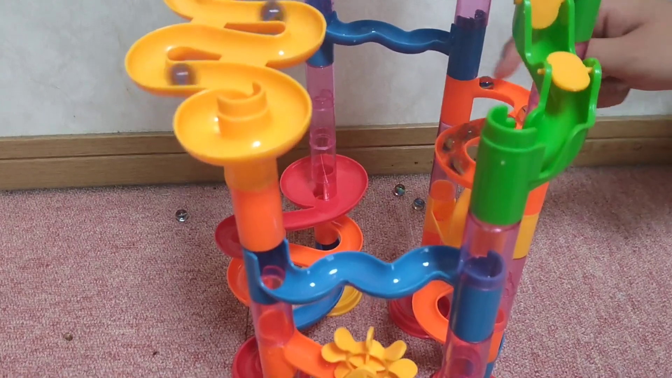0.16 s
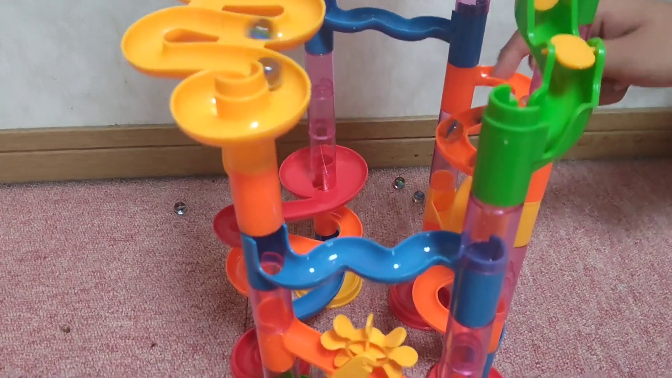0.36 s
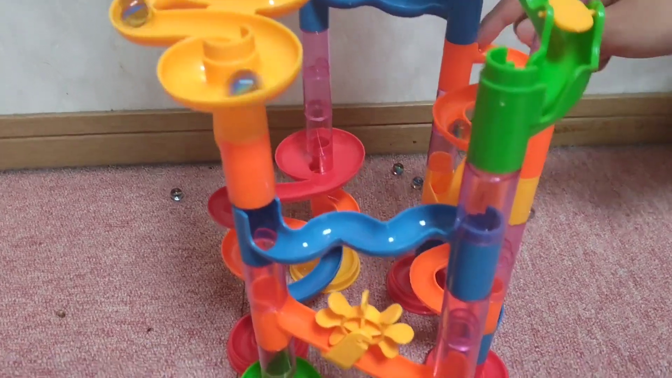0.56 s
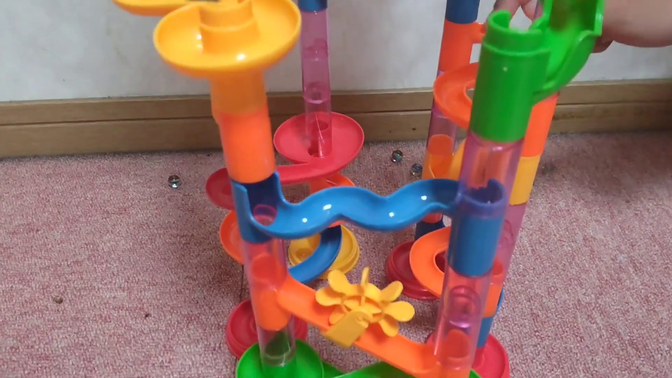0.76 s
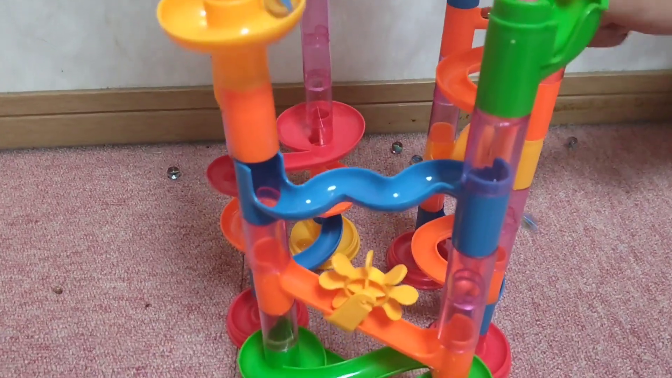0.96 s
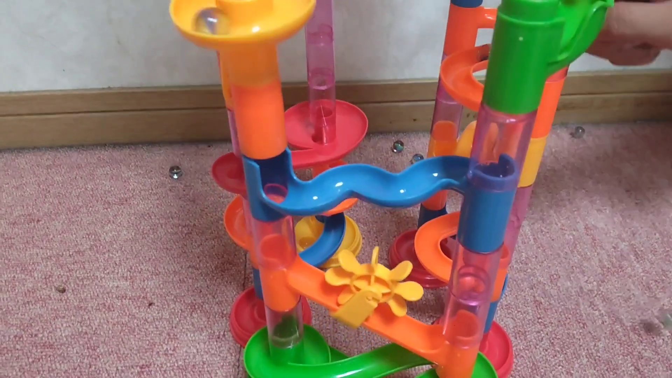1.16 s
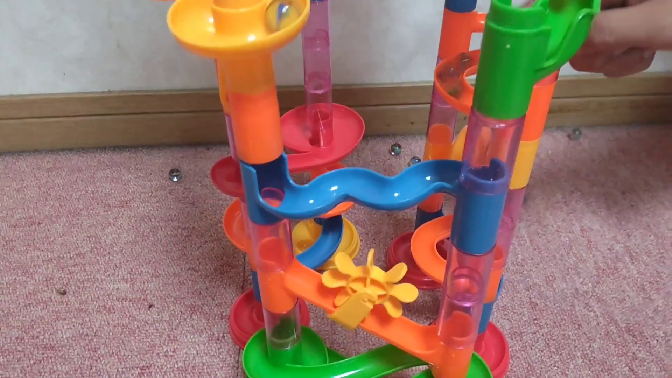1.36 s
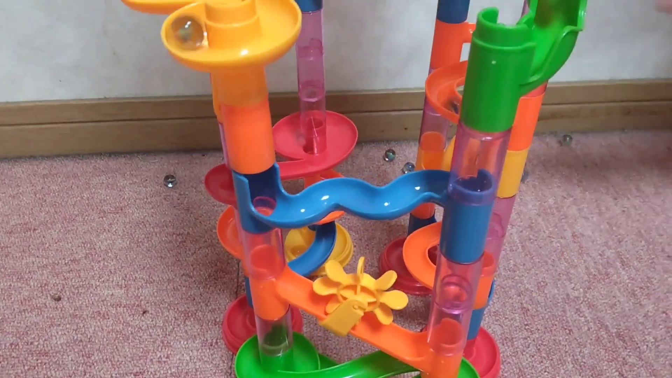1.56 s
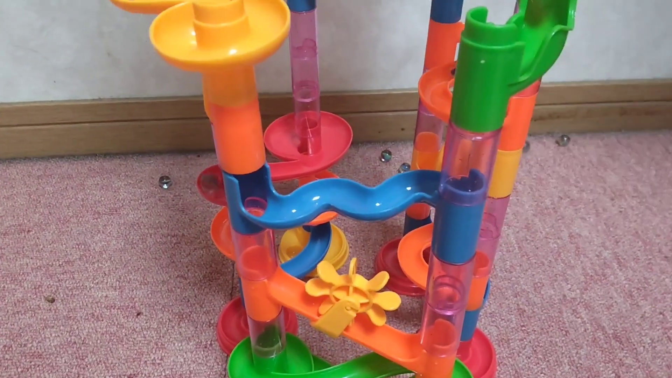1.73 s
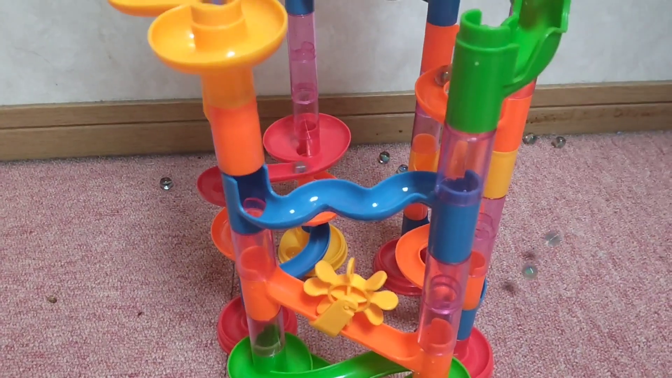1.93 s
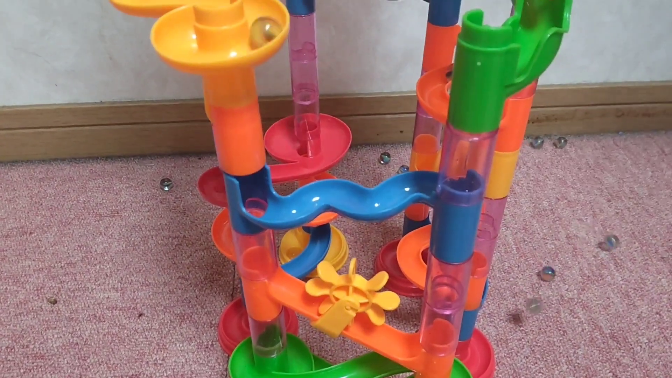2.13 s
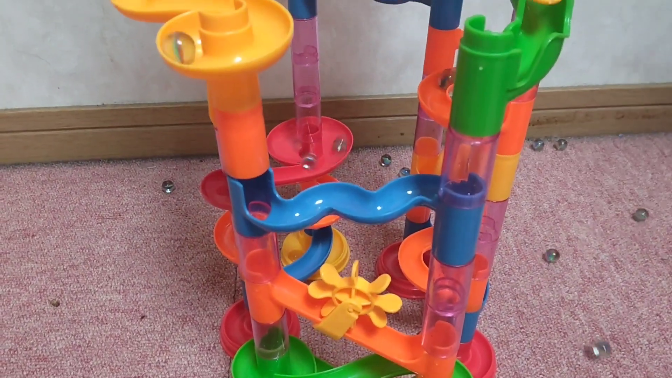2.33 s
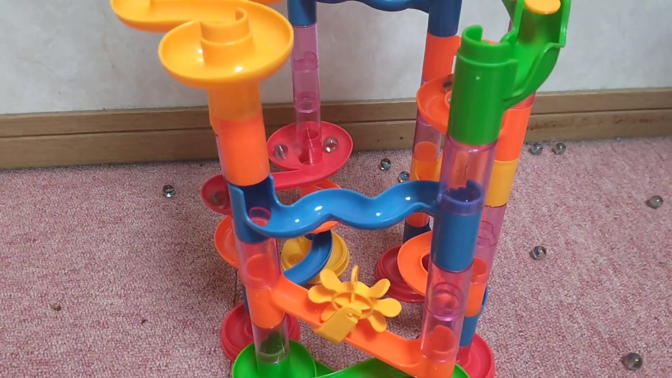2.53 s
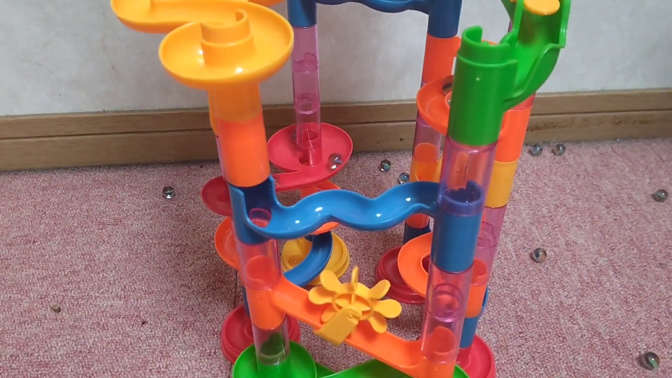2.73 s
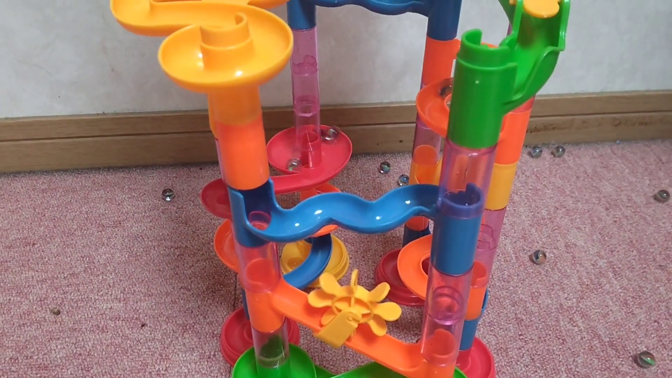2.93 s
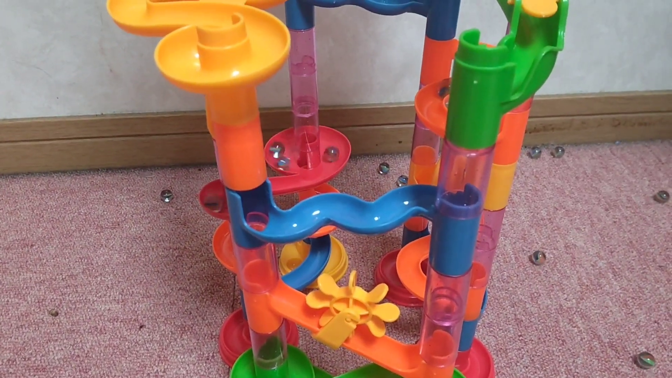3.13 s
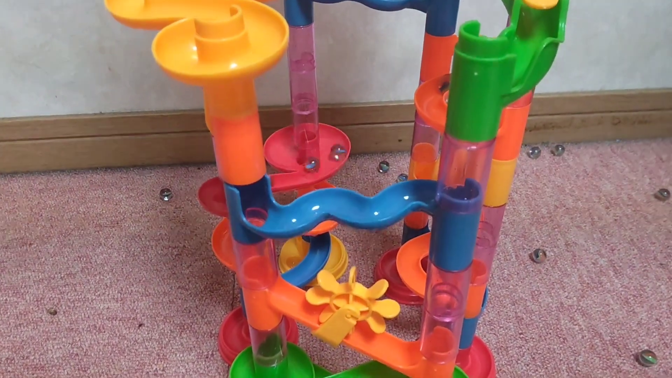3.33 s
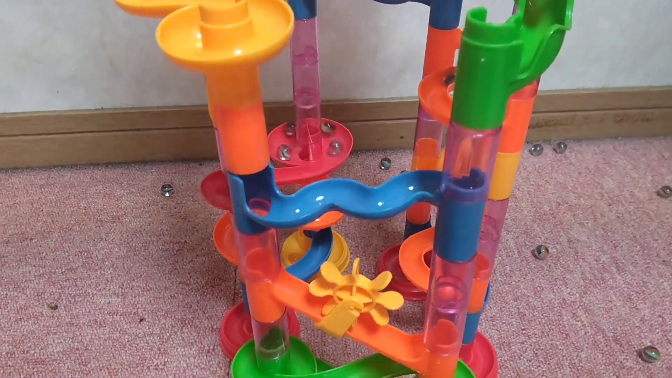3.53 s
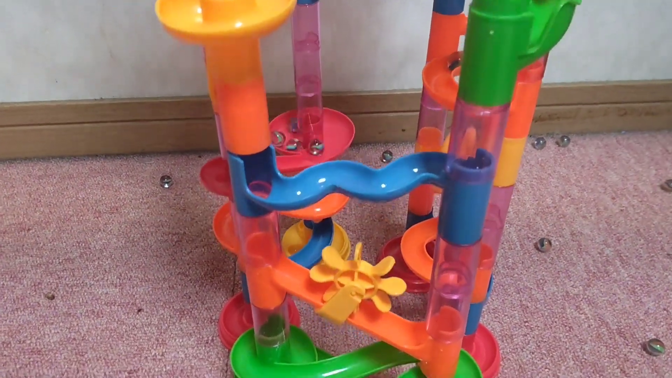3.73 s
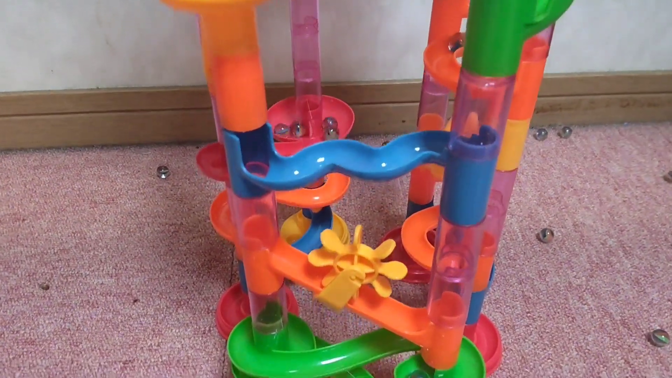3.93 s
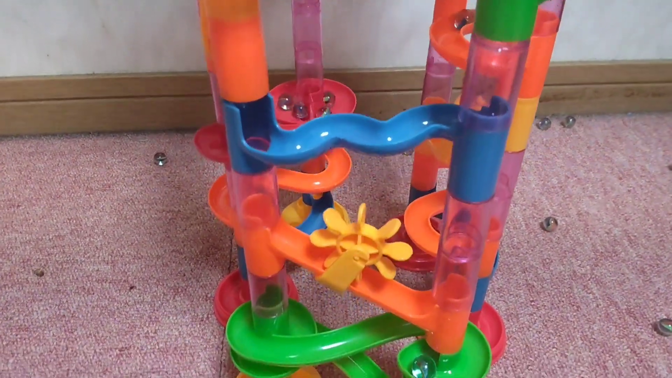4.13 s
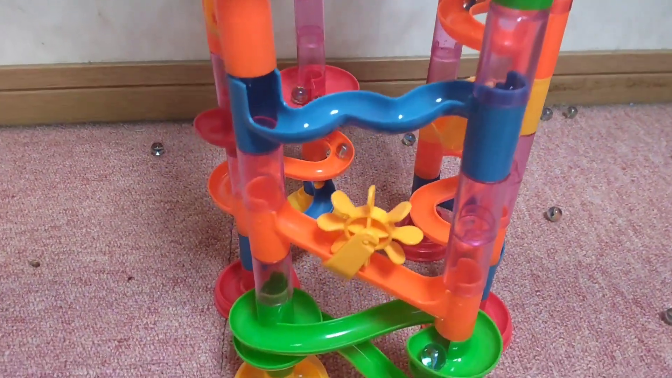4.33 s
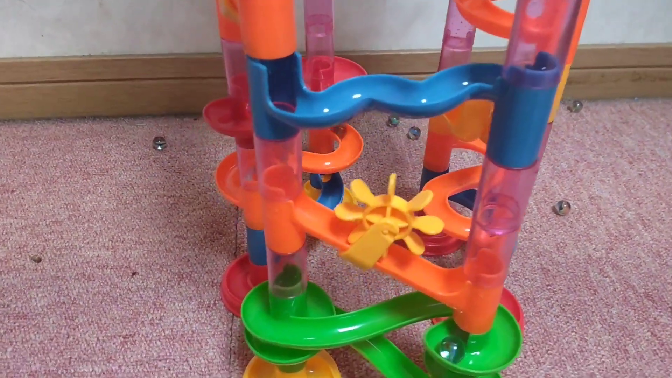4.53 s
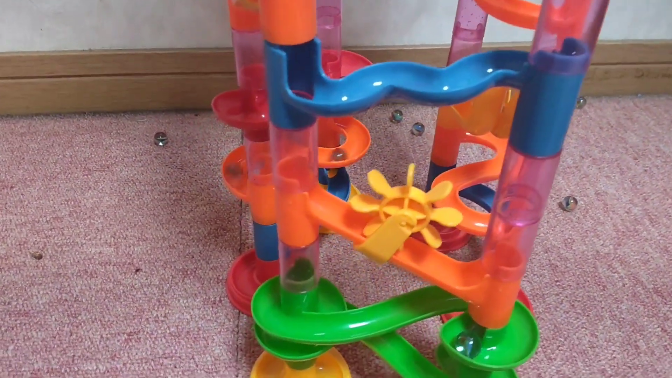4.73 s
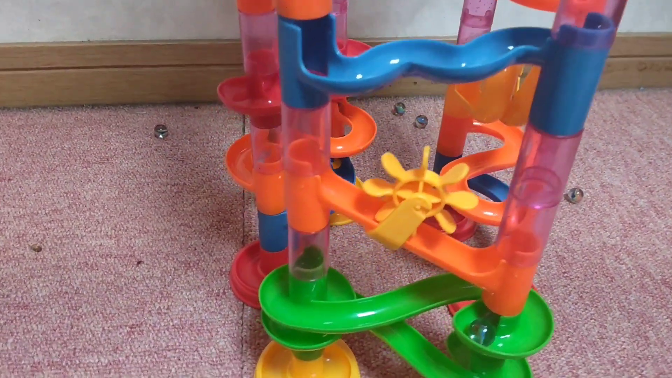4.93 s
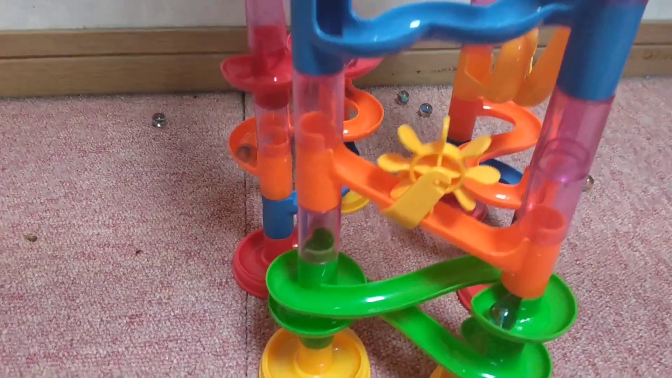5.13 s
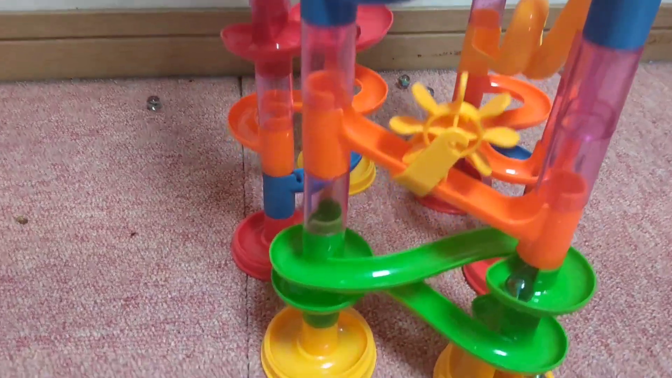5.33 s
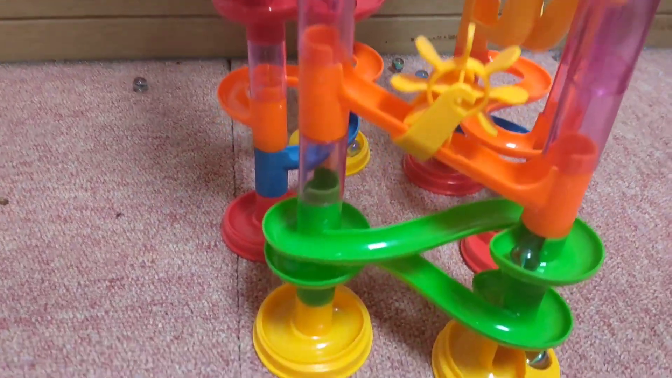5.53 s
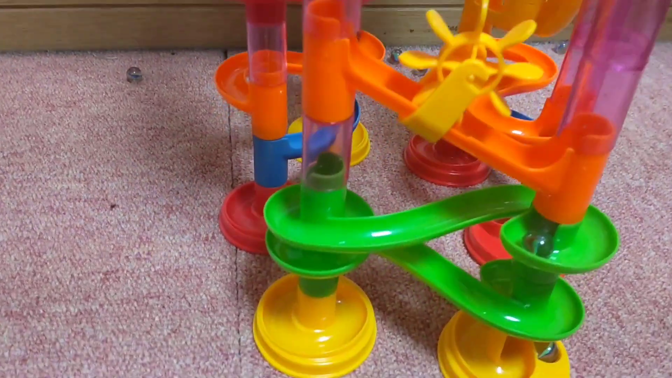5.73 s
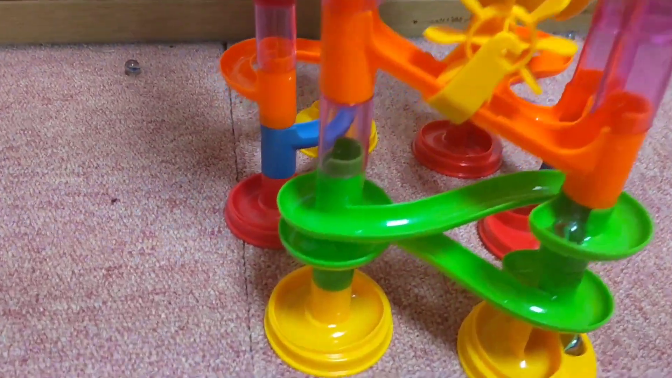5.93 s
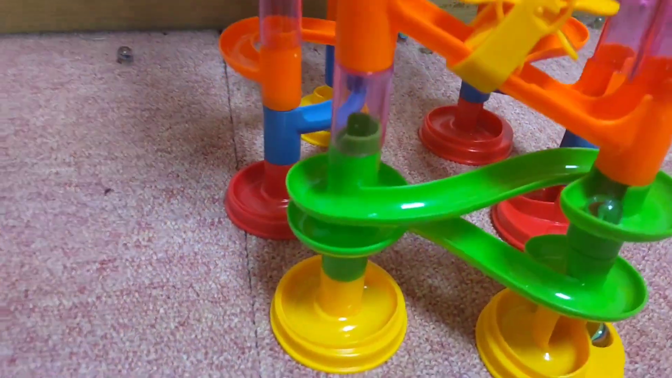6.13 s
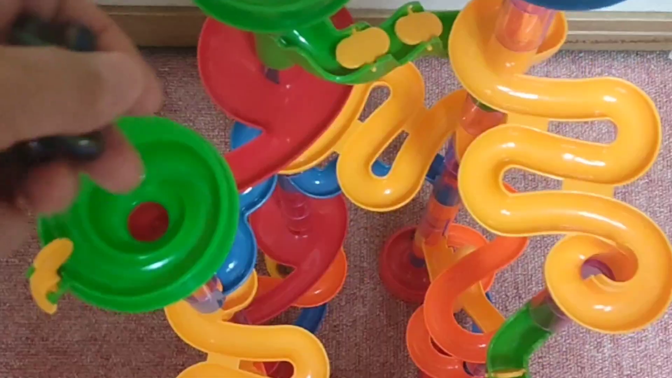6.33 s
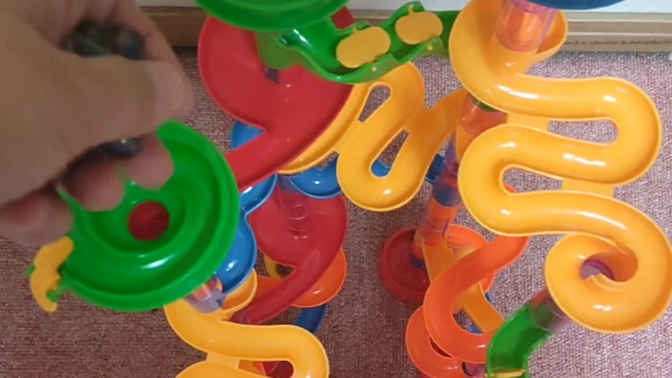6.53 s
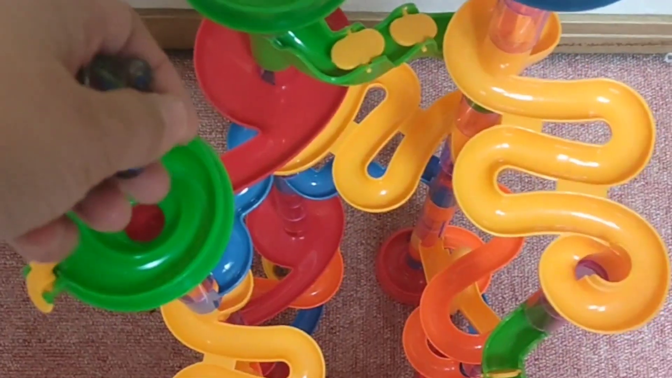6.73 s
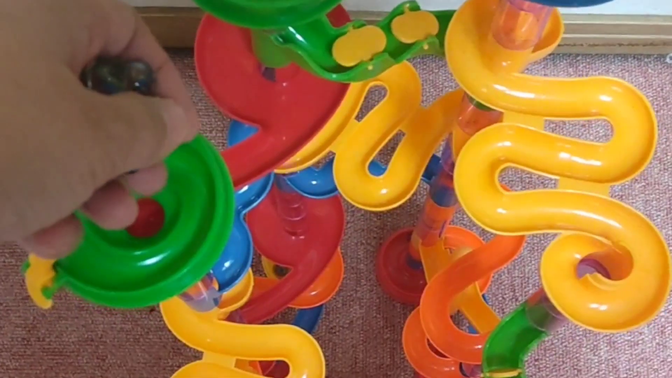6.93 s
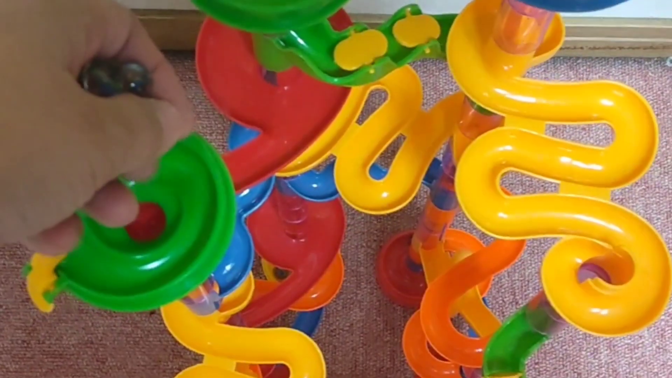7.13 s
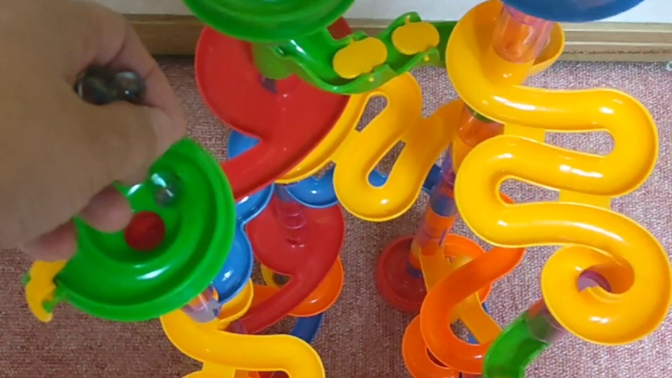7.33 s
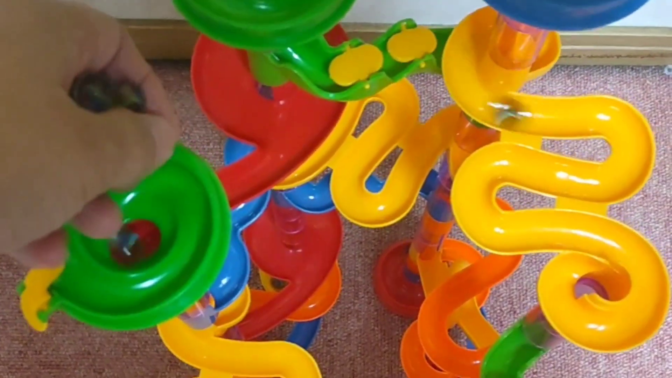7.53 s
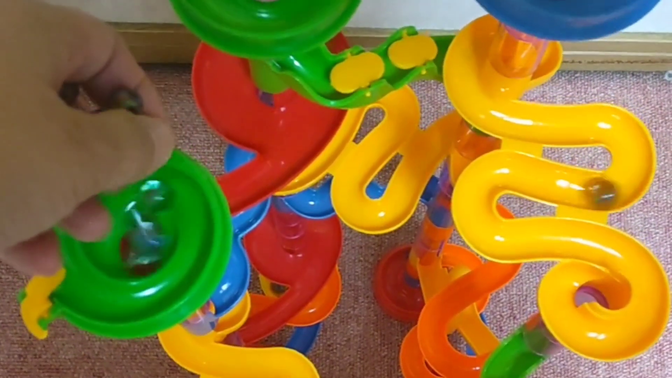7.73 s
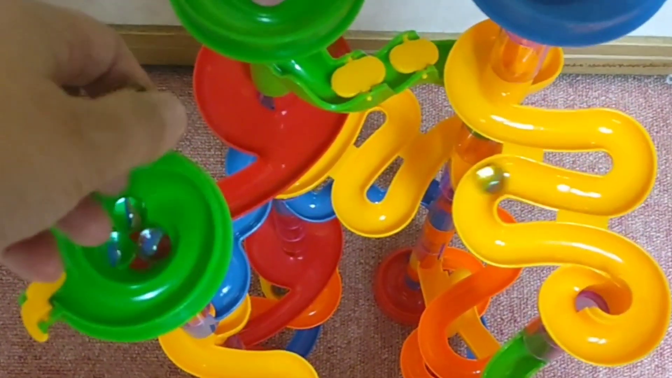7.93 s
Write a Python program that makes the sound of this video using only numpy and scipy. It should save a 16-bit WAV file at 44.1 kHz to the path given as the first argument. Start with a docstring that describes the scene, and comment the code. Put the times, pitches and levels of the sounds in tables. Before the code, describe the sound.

Dense, irregular plastic clatter from marbles rolling through a toy track, with short bursts of ricochet, bright glass ticks and faint carpet thuds. Gaps open before a last run down the low ramps. Sound abruptly drops out and fades back to very quiet room tone with a faint deep flutter. Then bright funnel hits and a growing circling rattle, heard close in a small, fairly dry room.

```python
"""Glass marbles roll, rattle and knock down a plastic toy track in a small carpeted room, near a camera.
From about 0.5 s a few drop onto the carpet; from about 1.6 s glass also ticks against glass.
At about 6.4 s the sound drops out briefly and fades back in, with a very deep, faint flutter.
From 7.4 s marbles strike a funnel and circle in it, more and more; low puffs mark microphone overload.
Struck and rolling parts are decaying noise bursts, shaped by resonances and heard with short reflections."""
import sys
import numpy as np
from scipy import signal
from scipy.fft import rfft, irfft
from scipy.io import wavfile
from scipy.ndimage import uniform_filter1d, map_coordinates

SR = 44100
rng = np.random.default_rng(int(sys.argv[2]) if len(sys.argv) > 2 else 0)


def put_to_file(sound):
    """Save the sound as 16-bit audio at rate SR, in the file named by the first command-line argument."""
    columns = np.atleast_2d(sound).T  # one column per channel
    safe = np.clip(columns, -1, 1)
    whole_steps = np.round(safe * 32767)
    wavfile.write(sys.argv[1], SR, whole_steps.astype(np.int16))


N = 355887  # length in samples


def amp(db):
    """Logarithmic level law: decibels to amplitude gain."""
    return 10 ** (np.asarray(db) / 20)


def evened(x):
    """Energy normalisation: scales to rms 1."""
    return x / np.sqrt(np.mean(x ** 2) + 1e-20)


def seconds():
    """Uniform sampling: the time of every sample in s."""
    return np.arange(N) / SR


def read(points, hz):
    """Logarithmic pitch scale: joins (f/Hz, value) points along log frequency."""
    f, value = np.transpose(points)
    return np.interp(np.log(hz + 1), np.log(f + 1), value)


def add(mix, s, sound):
    """Superposition: mixes a stereo sound in at time s."""
    part = mix[:, max(round(s * SR), 0):][:, :sound.shape[1]]
    part += sound[:, :part.shape[1]]


def panned(db, pan_db):
    """Intensity stereo: left and right gains around a level, pan_db apart."""
    return amp([[db + pan_db / 2], [db - pan_db / 2]])


def bins(size):
    """Fourier analysis: frequencies of a real FFT in Hz."""
    return np.fft.rfftfreq(size, 1 / SR)


def colour(x, curve_db, size=4096):
    """Minimum-phase filtering with gain curve_db(hz): it rings after a blow, never before."""
    hz = abs(np.fft.fftfreq(size, 1 / SR))
    log_gain = np.log(amp(curve_db(hz)))
    # the Hilbert transform of the log gain gives the causal phase
    taps = np.fft.ifft(np.exp(np.conj(signal.hilbert(log_gain)))).real
    return signal.fftconvolve(x, taps[None, :size // 2], axes=1)[:, :x.shape[1]]


def bumps(modes, hz):
    """Resonance curves: summed gain in dB of (f/Hz, width/Hz, height/dB) modes."""
    return sum(db / (1 + (2 * (hz - f) / width) ** 2) for f, width, db in modes)


def own_modes(height_db, sharpness, count=14):
    """Modal scatter: each moulded part has its own resonances and dead spots (f/Hz, width/Hz, height/dB)."""
    f = np.geomspace(1100, 13000, count) * np.exp(rng.uniform(-.09, .09, count))
    heights = height_db * rng.uniform(-.6, 1, count) * (f / 4000) ** .25
    return np.transpose([f, f / sharpness, heights])


def drift(rate_hz):
    """Slow random modulation: chance values of rms 1, joined by straight lines."""
    s = np.arange(0, N / SR + 1, 1 / rate_hz)
    return evened(np.interp(seconds(), s, rng.standard_normal(len(s))))


def level_of(points):
    """Amplitude envelope: gain along (t/s, level/dB) points, silent outside them."""
    return amp(np.interp(seconds(), *np.transpose(points), left=-120, right=-120))


# likeness of the noise at the two microphones: (f/Hz, share from 0 to 1)
LIKENESS_OF_EARS = [(100, 0.68), (700, 0.89), (2000, 0.71), (5000, 0.25), (14000, 0.094)]


def noise_pair(size):
    """Spatial coherence: white noise at two microphones, least alike in the treble."""
    a, b = rfft(rng.standard_normal((2, size)))
    same = np.clip(read(LIKENESS_OF_EARS, bins(size)), 0, 1)
    return irfft(np.array([a, same * a + np.sqrt(1 - same ** 2) * b]), size)


def burst(decay, tail_db, tail_decay, rise=0.00027, size=4096):
    """Dense modal decay: a quick crack, then the weaker ring of what is joined to the struck part."""
    t = np.arange(size) / SR
    power = np.exp(-t / decay) + amp(tail_db) ** 2 * np.exp(-t / tail_decay)
    shape = np.sqrt(power) * (1 - np.exp(-t / rise))
    return evened(noise_pair(size) * shape) * np.sqrt(np.mean(shape ** 2))


# hard blows gain treble and lose body by these shares of their hardness
EDGE_SHARE, BODY_SHARE = 1.1, 1


def knocks(rows, decay, tail_db, tail_decay, ring_db, ring_width_hz, own_db):
    """Contact stiffness: soft blows carry more body (near 1.5 kHz), hard ones more edge (over 9 kHz)."""
    out = np.zeros((2, N))
    for s, db, hard_db, ring_hz, pan_db in rows:
        body_db = -BODY_SHARE * hard_db
        edge_db = EDGE_SHARE * hard_db + 0.3
        tone = [(200, body_db / 2), (1500, body_db + 2.0), (2800, 0.0022), (5500, 0), (9000, edge_db)]
        modes = [(ring_hz, ring_width_hz, ring_db), *own_modes(own_db, sharpness=17)]
        blow = burst(decay, tail_db, tail_decay)
        blow = colour(blow, lambda hz: read(tone, hz) + bumps(modes, hz), size=1024)
        add(out, s, blow * panned(db, pan_db))
    return out


# the treble tilt falls by this share of the level below FULL_ROLL_DB: slow rolling is dull
DULL_SHARE, FULL_ROLL_DB = 0.33, -17


def band(x, hz, kind):
    """Zero-phase filtering: the part of x below ("low") or above ("high") hz."""
    return signal.sosfiltfilt(signal.butter(2, hz, kind, fs=SR, output="sos"), x)


def rolling(gain, skips_per_s, spread_db, skip_decay, own_db, wander_db, smooth_db, bright_db, count=16):
    """Rolling as repeated impact: skips on seams and bumps each ring the part being crossed."""
    tilt_db = bright_db + DULL_SHARE * (20 * np.log10(gain) - FULL_ROLL_DB)
    rattle, force = np.zeros((2, N)), np.zeros(N)
    for _ in range(count):
        sizes = amp(spread_db * np.minimum(rng.exponential(1, N), 3) + wander_db * drift(6))
        skips = sizes * (rng.random(N) < skips_per_s / count / SR)
        modes = own_modes(own_db, sharpness=21)
        part = burst(skip_decay, tail_db=-6.5, tail_decay=.009, size=2048)
        part = colour(part, lambda hz: bumps(modes, hz))
        rattle += signal.oaconvolve(skips[None], evened(part), axes=1)[:, :N]
        force += skips ** 2
    # many light skips or a few heavy ones carry the same weight
    force = abs(uniform_filter1d(force, size=2200))
    grit = evened(rattle / np.sqrt(force + 0.072 * force.mean()))
    grit = grit + amp(smooth_db) * noise_pair(N)
    low, high = band(grit, 2000, "low"), band(grit, 7000, "high")
    return gain * (grit + low * (amp(-tilt_db) - 1) + high * (amp(tilt_db) - 1))


# spectrum of the room tone: (f/Hz, relative level/dB)
AIR_SPECTRUM = [(20, -27), (65, -33), (170, -34), (260, -32.5), (400, -34), (1000, -37.5), (2200, -43.5),
                (5000, -46), (7500, -52.5), (14000, -54.5)]


def air():
    """Stationary background noise: faint room tone, strongest in the deep bass."""
    return amp(-52.0) * evened(colour(noise_pair(N), lambda hz: read(AIR_SPECTRUM, hz), size=16384))


# marbles rolling along the open chutes: (t/s, relative level/dB)
CHUTE_LEVEL = [(0, -26.5), (1.1, -32.5), (1.2, -37), (2.0, -31.5), (2.6, -32), (2.8, -40), (3.0, -30.5),
               (3.3, -38.5), (3.9, -36), (4.17, -51.5), (4.4, -68.5), (4.5, -42.5), (5.3, -36.5),
               (5.58, -38), (5.68, -50.5), (5.95, -39), (6.22, -43), (6.34, -61.5)]
# spectrum of a marble rolling freely in an open chute: (f/Hz, relative level/dB)
CHUTE_SPECTRUM = [(30, -31), (60, -32.5), (95, -14.5), (200, -24.5), (470, -20), (700, -18), (1400, -5),
                  (2300, -3.5), (3500, -1), (4400, -6.5), (6500, -5.5), (8700, -13.5), (14000, -13.5)]


def chutes():
    """Dense repeated impact: free rolling is a softer, warmer whirr."""
    roll = rolling(level_of(CHUTE_LEVEL), skips_per_s=330, spread_db=2, skip_decay=0.003, own_db=14.5,
                   wander_db=3.5, smooth_db=-12.5, bright_db=-0.1)
    return colour(roll, lambda hz: read(CHUTE_SPECTRUM, hz))


# a marble strikes the track:
# (t/s, relative level/dB, hardness/dB, ring of the struck part f/Hz, left-right/dB)
TRACK_KNOCKS = [(0.1261, -9.5, 2.5, 2500, -3), (0.1341, -13.5, -0.5, 4080, -1), (0.166, -14, -3.5, 3420, 1),
                (0.2175, -12, -4, 2930, 3), (0.293, -8.5, 1.5, 2470, 4), (0.3161, -10.5, 5, 3350, -3),
                (0.3896, -9, 0, 2750, 2), (0.464, -7, 5.5, 3400, 1), (0.5766, -12.5, 3.5, 2110, -2),
                (0.6061, -9, -1, 3500, -4.5), (0.697, -13, -1, 2110, 3), (0.7076, -10, 3, 3500, 0.5),
                (0.754, -20, 0, 3630, 5), (0.8366, -10.5, 0.5, 3490, -0.5), (0.889, -20.5, 0.5, 1960, 11),
                (0.944, -12, -4.5, 3400, 1), (0.993, -19, -11, 4130, 3), (1.0329, -11, 3, 4440, 1),
                (1.0828, -18, 0, 4050, 6), (1.098, -11, 1.5, 3500, 1), (1.142, -14, 5, 3530, 2),
                (1.2827, -15.5, -1.5, 3660, 1), (1.353, -9.5, 3.5, 3380, -8), (1.369, -20, -4.5, 3060, -15),
                (1.418, -21.5, 1, 2960, -8), (1.4604, -9.5, -3, 3500, 5), (1.491, -9.5, -5.5, 3300, 1.5),
                (1.5307, -16.5, -3, 4600, 5), (1.576, -12, 1, 4500, 0.5), (1.672, -12.5, 1.5, 3500, -2.5),
                (1.7148, -9, 1.5, 3600, 0), (1.7629, -11, 0.5, 4060, -1), (1.8026, -11, 2.5, 3220, -3),
                (1.8384, -12.5, 2, 3480, 3), (1.894, -15, 2, 3200, 11), (1.9281, -8.5, 0.5, 3430, 0),
                (2.0861, -7, 1.5, 3440, 1.5), (2.145, -15.5, 2, 3400, 3), (2.229, -17, -3.5, 3220, 0),
                (2.2595, -8.5, -0.5, 3100, -2.5), (2.293, -14, 7, 2610, -2), (2.3563, -7, -3.5, 3120, 3),
                (2.4232, -17.5, -3, 2670, 0), (2.6137, -18.5, -1, 4500, 0), (2.665, -11, -3, 4560, 0),
                (2.7026, -10.5, -1.5, 4050, 1.5), (2.745, -17.5, 1, 4350, 3),
                (2.9618, -22.5, -5.5, 3170, -8), (2.9939, -6, 0, 3100, -0.5), (3.04, -21.5, 7, 3100, -1.5),
                (3.0802, -6.5, 2, 3200, 0.5), (3.099, -16.5, -4.5, 3100, 1.5), (3.1716, -19, 1, 5450, -2),
                (3.193, -11, -1.5, 3900, 3.5), (3.821, -16.5, -2, 4100, -1.5), (3.9913, -19, 0.5, 1460, 5),
                (4.0748, -18, 1.5, 4310, 3), (4.0845, -21, -4, 4350, -5), (4.2239, -20, -2, 4280, -2),
                (4.3166, -27, -0.5, 1470, 1), (4.4146, -28.5, -1.5, 1700, 4), (4.4303, -8, -.5, 3880, -0.5),
                (4.476, -19, -3.5, 4100, 1), (4.614, -17.5, 0.5, 3330, 2), (4.6575, -9.5, -1, 3640, 1),
                (4.8434, -22.5, -0.5, 4950, -1), (5.038, -19.5, 9, 2900, 4), (5.068, -16.5, -3, 3100, -1),
                (5.0865, -6, 0, 4070, 2.5), (5.1262, -16.5, -4, 3870, 4), (5.164, -19, -2.5, 4530, 3),
                (5.3345, -7.5, 3.5, 3750, 2), (5.3517, -13.5, -2.5, 2540, 1), (5.4035, -6.5, 2, 4750, 3.5),
                (5.4743, -7.5, -5, 5040, -0.5), (5.5212, -17.5, -1, 3900, 2), (5.5488, -20, -4, 3630, -4),
                (5.8728, -24, -5, 6450, 2.5), (5.9392, -25, -5, 4180, 3), (5.987, -17.5, -3, 1180, 3),
                (6.0136, -9.5, 3.5, 3100, 2), (6.0314, -14.5, 0, 3320, -5), (6.0667, -7.5, 0, 4100, 2),
                (6.143, -13.5, -7, 3900, 2.5), (6.1885, -17.5, -4, 4180, 0), (6.2137, -28, -5, 3610, 1)]
# spectrum of the struck track: (f/Hz, relative level/dB)
KNOCK_SPECTRUM = [(30, -30.5), (60, -44), (95, -15), (200, -23.5), (470, -22.5), (700, -22), (1150, -8.5),
                  (2300, -3.5), (3400, 0), (4200, -4), (6500, -2.5), (8700, -12.5), (14000, -13)]


def track_knocks():
    """Impact excitation: each blow rings its own part of the track."""
    blows = knocks(TRACK_KNOCKS, decay=0.0031, tail_db=-10.0, tail_decay=0.011, ring_db=8.5,
                   ring_width_hz=474, own_db=10)
    return colour(blows, lambda hz: read(KNOCK_SPECTRUM, hz))


RATTLE_RISE_S, RATTLE_FADE_DB_PER_S = 0.0054, 449.5
# after a knock the marble chatters on, weaker and dying away
CHATTER_DB, CHATTER_FADE_DB_PER_S = -17, 220.5


def spell(start, length, db, fade_db_per_s):
    """Exponential decay: gain of a spell of rattling, with a quick rise, a hold and a fade."""
    t = np.maximum(seconds() - start, 0)
    fade_db = np.minimum(fade_db_per_s * np.maximum(t - length, 0), 100)
    return np.minimum(t / RATTLE_RISE_S, 1) * amp(db - fade_db)


# a marble ricochets down a tube or through a bend: (t/s, length/s, relative level/dB)
RATTLE_SPELLS = [(0.131, 0.11, -17), (0.286, 0.14, -21), (0.579, 0.05, -19.5), (0.95, 0.066, -14),
                 (1.079, 0.04, -28), (1.447, 0.022, -17), (1.738, 0.26, -20.5), (2.262, 0.066, -24.5),
                 (2.445, .11, -29.5), (2.994, 0.12, -26), (3.181, 0.042, -25.5), (4.611, 0.073, -21),
                 (4.799, 0.02, -29), (5.018, 0.11, -20.5), (5.328, 0.17, -25.5), (6.011, 0.031, -29.5),
                 (6.184, 0.043, -27.5)]


def agitation():
    """Power addition: spells in the tubes and chatter after each knock sum as energies."""
    power = sum(spell(s, length, db, RATTLE_FADE_DB_PER_S) ** 2 for s, length, db in RATTLE_SPELLS)
    power += sum(spell(s, 0, db + CHATTER_DB, CHATTER_FADE_DB_PER_S) ** 2 for s, db, *_ in TRACK_KNOCKS)
    return np.sqrt(power + 1e-12)


# spectrum of the rattling: (f/Hz, relative level/dB)
RATTLE_SPECTRUM = [(30, -31), (60, -28.5), (95, -13), (200, -28), (470, -18), (700, -16.5), (1300, -6),
                   (2400, -3), (3500, -2.5), (4400, -3.5), (6500, -7.5), (8700, -15.5), (14000, -16.5)]


def rattles():
    """Sparse repeated impact: a string of separate ricochets over little hiss."""
    rattle = rolling(agitation(), skips_per_s=160, spread_db=2.5, skip_decay=0.0024, own_db=15.5,
                     wander_db=3, smooth_db=-17, bright_db=1.1)
    return colour(rattle, lambda hz: read(RATTLE_SPECTRUM, hz))


# resonances of the whole track: (f/Hz, width/Hz, height/dB)
TRACK_RESONANCES = [(644, 130, 6.5), (741, 180, 7.5), (1143, 67, 3.5), (1240, 51, 2.5), (1380, 30, 2.5),
                    (1633, 53, 5), (1800, 170, 3), (2055, 34, 6.5), (2220, 90, 5), (2563, 150, 5.5),
                    (3104, 220, 4), (3594, 260, 5), (4170, 110, 3.5), (4550, 240, 5), (5630, 750, 3)]
# from this time on the marbles roll on the lowest ramps
LOW_RAMPS_S = 4.46
# resonances that the lowest ramps add: (f/Hz, width/Hz, height/dB)
LOW_RAMP_RESONANCES = [(810, 140, 4.5), (1410, 430, -1), (3830, 220, -1)]


def track():
    """Shared resonance: all track sounds pass the same plastic; the lowest ramps ring hollower."""
    sources = amp(7.5) * track_knocks() + amp(9.5) * rattles() + amp(10.5) * chutes()
    plastic = colour(sources, lambda hz: bumps(TRACK_RESONANCES, hz))
    low = np.clip((seconds() - LOW_RAMPS_S) * 10, 0, 1)  # crossfade over 0.1 s
    return (1 - low) * plastic + low * colour(plastic, lambda hz: bumps(LOW_RAMP_RESONANCES, hz))


# a marble lands on the carpet: (t/s, relative level/dB)
CARPET_LANDINGS = [(0.52, -44), (0.691, -43.5), (1.256, -36), (1.459, -44), (1.52, -42), (2.011, -37),
                   (2.073, -38.5), (2.2, -45.5), (2.297, -34.5), (2.46, -41.5)]
# spectrum of a landing: (f/Hz, relative level/dB)
CARPET_SPECTRUM = [(20, -31), (90, -16.5), (180, -9), (290, -3.5), (380, -6.5), (520, -28.5), (2000, -55.5),
                   (14000, -67)]


def thuds():
    """Soft-contact damping: the carpet swallows the click and leaves a dull bump of the floor."""
    out = np.zeros((2, N))
    for s, db in CARPET_LANDINGS:
        bump = burst(decay=0.0097, tail_db=-23, tail_decay=0.028)
        bump = colour(bump, lambda hz: read(CARPET_SPECTRUM, hz))
        add(out, s, amp(db - 5.5) * evened(bump))
    return out


# glass meets glass: (t/s, relative level/dB, left-right/dB)
GLASS_CLICKS = [(1.627, -16.5, 0), (1.644, -19, -5), (2.829, -32, -5), (2.964, -27, 0), (3.14, -20, 1.5),
                (3.172, -23, -7.5), (3.486, -24, 2), (3.542, -28, 2), (3.6453, -12, 5), (3.859, -23, 0),
                (4.205, -35, -1), (4.28, -31, -1.5), (4.57, -25.5, 1), (4.98, -31.5, -3), (5.9, -32, -3),
                (6.8175, -43, -12), (7.297, -26, -15.5), (7.328, -52, -2)]
# spectrum of a glass tick: (f/Hz, relative level/dB)
GLASS_SPECTRUM = [(100, -27), (1500, -17), (5000, -4), (9000, -9.5), (11500, -2.5), (14000, -1.5)]


def clicks():
    """Stiff-contact impact: marbles touch each other with a very short, bright tick."""
    out = np.zeros((2, N))
    for s, db, pan_db in GLASS_CLICKS:
        tick = burst(decay=0.00097, tail_db=-18.5, tail_decay=.008, rise=.0001)
        add(out, s, tick * panned(db, pan_db))
    return amp(7.5) * colour(out, lambda hz: read(GLASS_SPECTRUM, hz))


RUMBLE_START_S, RUMBLE_RISE_S, RUMBLE_DB, RUMBLE_FADE_DB_PER_S = 6.64, .04, -48, 4
# spectrum of the deep flutter, mostly below hearing: (f/Hz, relative level/dB)
RUMBLE_SPECTRUM = [(0, 0), (4, -3), (10, -22), (35, -27), (80, -40), (400, -75)]


def rumble():
    """Low-pass noise: a very deep, faint flutter sets in after the dropout and slowly fades."""
    noise = rng.standard_normal((1, N))
    deep = evened(colour(noise, lambda hz: read(RUMBLE_SPECTRUM, hz), size=32768))
    t = np.maximum(seconds() - RUMBLE_START_S, 0)
    return deep * np.minimum(t / RUMBLE_RISE_S, 1) * amp(RUMBLE_DB - RUMBLE_FADE_DB_PER_S * t)


# a marble strikes the funnel:
# (t/s, relative level/dB, hardness/dB, ring of the struck part f/Hz, left-right/dB)
FUNNEL_DROPS = [(7.3651, -11, 1.5, 4600, -6.5), (7.3728, -21, 0.5, 2720, 12), (7.38, -18, 0, 2820, -3.5),
                (7.4314, -33.5, 3, 3270, -1), (7.488, -35, -3, 3000, -2), (7.5019, -7, .5, 4330, 2),
                (7.5643, -20.5, 3.5, 2540, 3), (7.6022, -19, -3, 2670, -5), (7.616, -16, -2, 3260, -9.5),
                (7.7033, -9, 2.5, 2720, -2.5), (7.8159, -24, 3, 2820, -12), (7.827, -21.5, 2, 2720, -10),
                (7.845, -14, 5.5, 3040, -0.5), (7.8788, -24.5, 6, 2630, 3), (7.9111, -14, 5.5, 3160, 6),
                (7.9391, -22, 4, 3050, 5), (7.9625, -19.5, 2, 3060, 5), (7.978, -14, 5, 3140, 10),
                (8.029, -15, 4, 4000, 9)]
# more and more marbles circle in the funnel: (t/s, relative level/dB)
CIRCLING_LEVEL = [(7.37, -44), (7.48, -54), (7.6, -35), (7.87, -42), (7.94, -28), (8.07, -25.5)]
# spectrum of the funnel: (f/Hz, relative level/dB)
FUNNEL_SPECTRUM = [(30, -22.5), (100, -23), (430, -24), (700, -12.5), (1200, -14.5), (1900, -5), (2900, -5),
                   (3900, -4.5), (6300, -4.5), (8000, -16.5), (14000, -11.5)]
# resonances of the funnel: (f/Hz, width/Hz, height/dB)
FUNNEL_RESONANCES = [(1280, 250, 5.3), (2580, 1500, 13), (2900, 220, 2.1), (3250, 250, 4), (4630, 240, 11),
                     (6370, 450, 8), (7800, 490, 12), (9800, 420, 8.3), (10900, 550, 6.9)]


def funnel():
    """Shell resonance: one thin bowl with a few broad modes; circling carries less deep bass than blows."""
    blows = knocks(FUNNEL_DROPS, decay=0.0027, tail_db=-33.0, tail_decay=0.0059, ring_db=7,
                   ring_width_hz=320, own_db=11.5)
    roll = rolling(level_of(CIRCLING_LEVEL), skips_per_s=160, spread_db=1.0, skip_decay=0.00089,
                   own_db=10.5, wander_db=1, smooth_db=-11, bright_db=-4.5)
    roll_tone = [(60, -14), (500, 2.5), (1800, -2.5), (2800, -1.5), (5000, 5.5)]  # (f/Hz, gain/dB)
    roll = colour(roll, lambda hz: read(roll_tone, hz))
    both = amp(11.5) * blows + amp(12.0) * roll
    return colour(both, lambda hz: read(FUNNEL_SPECTRUM, hz) + bumps(FUNNEL_RESONANCES, hz))


# one-sided low puffs as the hardest hits overload the microphone: (t/s, relative peak level/dB)
OVERLOAD_PUFFS = [(7.505, -21), (7.703, -21), (7.846, -18)]


def overload_puffs():
    """Asymmetric overload: one-sided low puffs as the hardest hits overload the microphone."""
    out = np.zeros((2, N))
    u = np.arange(4096) / SR / 0.00038  # time in units of the 0.38 ms rise
    puff = u * np.exp(1 - u)
    for s, db in OVERLOAD_PUFFS:
        add(out, s, -amp(db) * np.array([puff, puff]))
    return out


# reverberation time of the room: (f/Hz, t60/s)
ROOM_DECAY = [(100, 0.6), (600, 0.07), (2500, 0.17), (6000, 0.033), (14000, .15)]


def room(x, size=16384):
    """Reverberation: sparse reflections from walls and furniture, decaying at a rate set by frequency."""
    taps = rng.standard_normal((2, size)) * (rng.random((2, size)) < 4000 / SR)
    taps[:, :round(.004 * SR)] = 0  # no reflection in the first 4 ms
    hz, t, z = signal.stft(taps, SR, nperseg=256)
    decay = amp(-60 * t / read(ROOM_DECAY, hz)[:, None])
    tail = signal.istft(z * decay, SR, nperseg=256)[1]
    tail = tail / np.linalg.norm(tail, axis=1, keepdims=True)
    return signal.fftconvolve(x, tail, axes=1)[:, :N]


# as the camera moves, the right microphone hears the toy later: (t/s, delay/samples)
RIGHT_LAG = [(0, 1), (1.5, 1), (2.7, 5), (8, 5)]


def scene():
    """Interaural delay: the toy stands a little to the left, in a room that answers briefly."""
    left, right = track() + funnel() + clicks() + thuds() + overload_puffs()
    lag = np.interp(seconds(), *np.transpose(RIGHT_LAG))
    toy = np.array([left, map_coordinates(right, [np.arange(N) - lag], order=5)])
    return toy + amp(-11.0) * room(toy) + air() + rumble()


# colour of the two microphones: (f/Hz, left-right/dB)
MICROPHONE_BALANCE = [(60, -0.5), (700, 0), (1290, 2.5), (2380, -4), (4400, -3.5), (8120, 4), (15000, 2.5)]
# the sound drops out and fades back in; the end levels hold before and after: (t/s, gain/dB)
DROPOUT = [(6.334, -4.5), (6.362, -43.5), (6.44, -66), (6.46, -17.5), (6.65, -10.5), (6.848, -7.5)]
EDGE_HZ = 14400  # upper band limit


def record(dry):
    """Transducer response: microphone colour, the dropout, smooth overload and the band limit."""
    balance = amp(read(MICROPHONE_BALANCE, bins(N)) * np.array([[.5], [-.5]]))
    x = irfft(rfft(dry) * balance, N)
    x = x * amp(np.interp(seconds(), *np.transpose(DROPOUT)))
    ceiling = np.where(x > 0, .9, .92)
    x = x / (1 + (x / ceiling) ** 4) ** (1 / 4)
    low_pass = signal.firwin(141, EDGE_HZ, window=("kaiser", 8), fs=SR)
    return signal.oaconvolve(x, low_pass[None], "same")


dry = scene()
out = record(dry)
put_to_file(out)
```